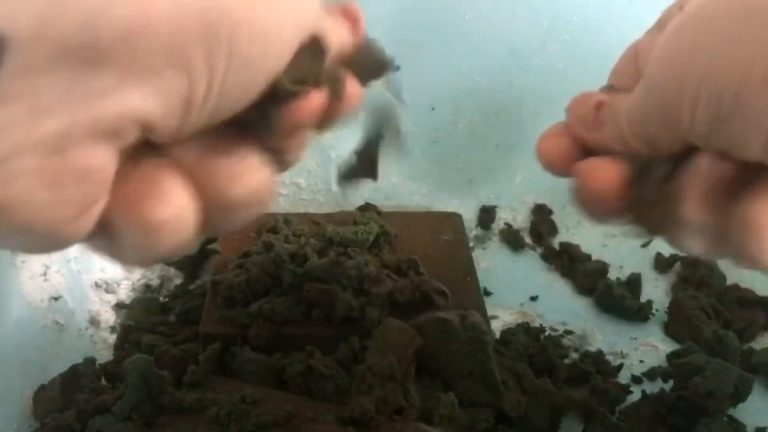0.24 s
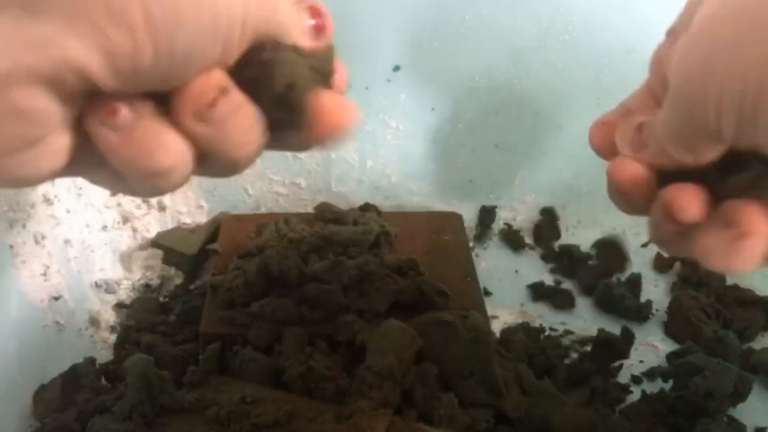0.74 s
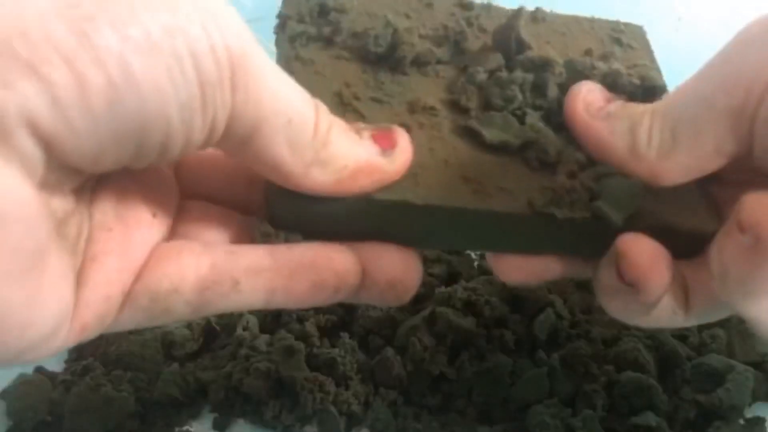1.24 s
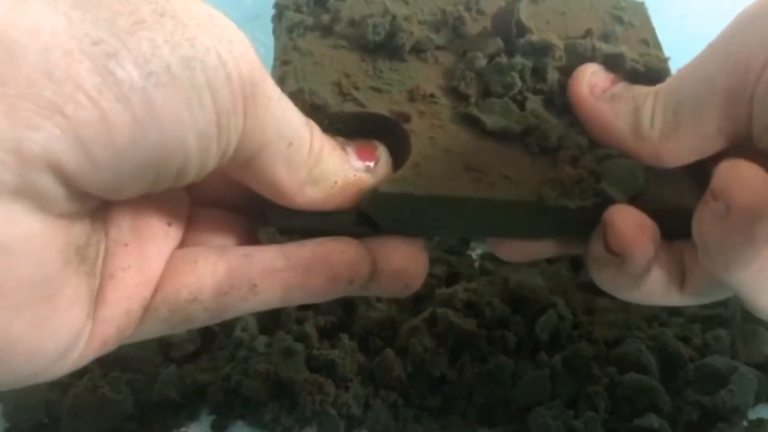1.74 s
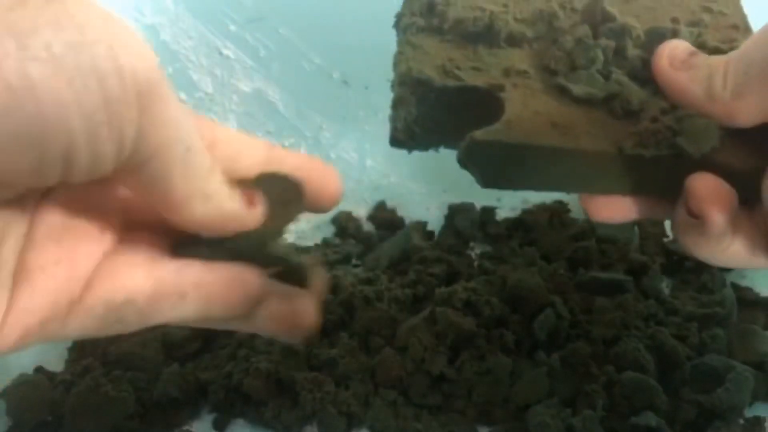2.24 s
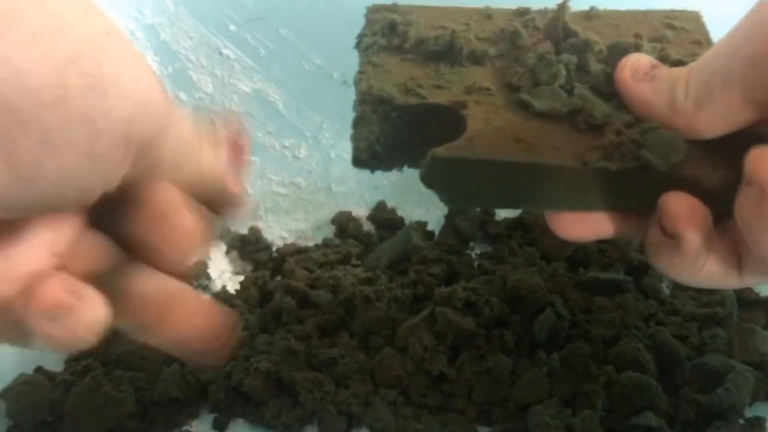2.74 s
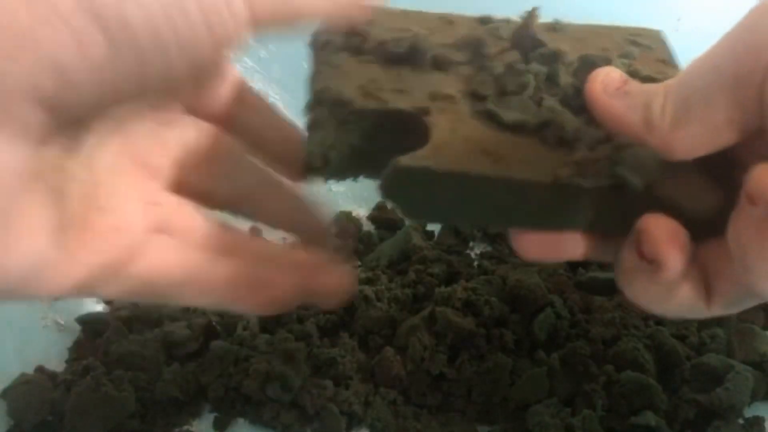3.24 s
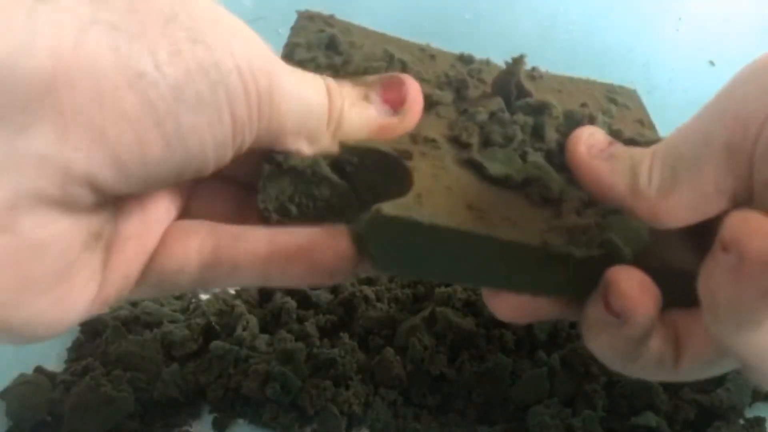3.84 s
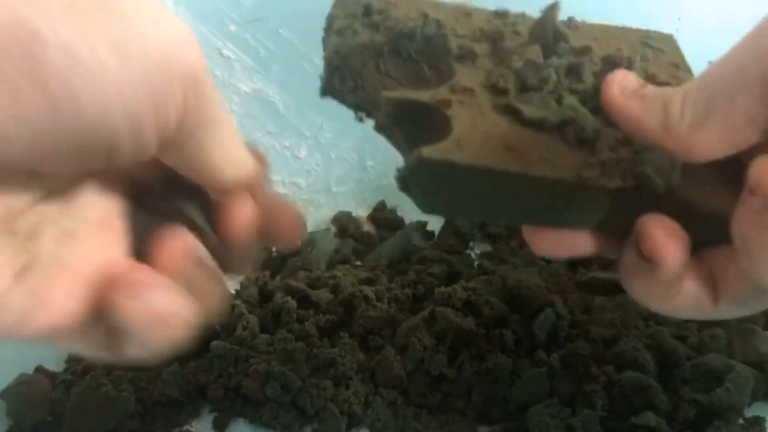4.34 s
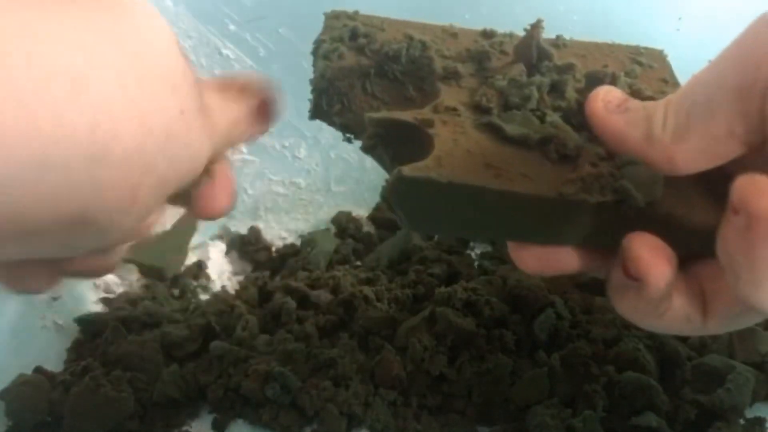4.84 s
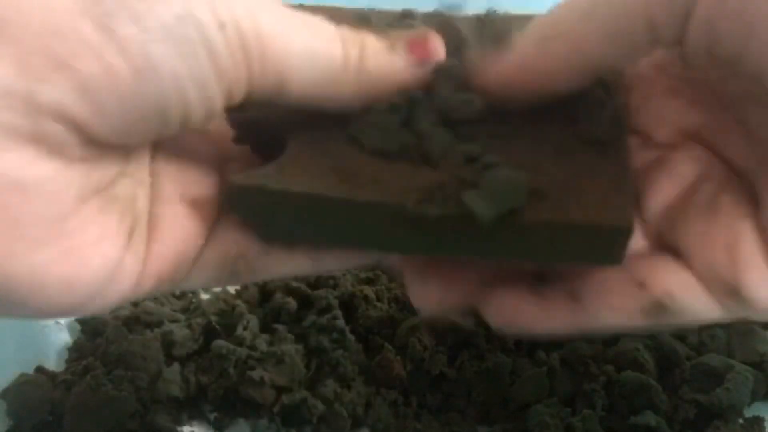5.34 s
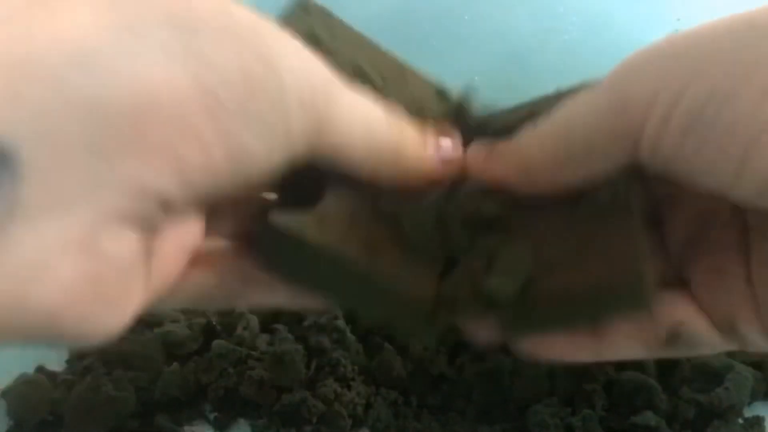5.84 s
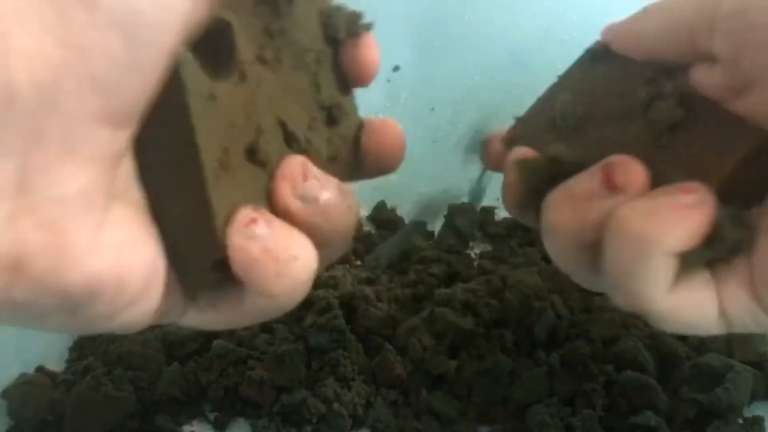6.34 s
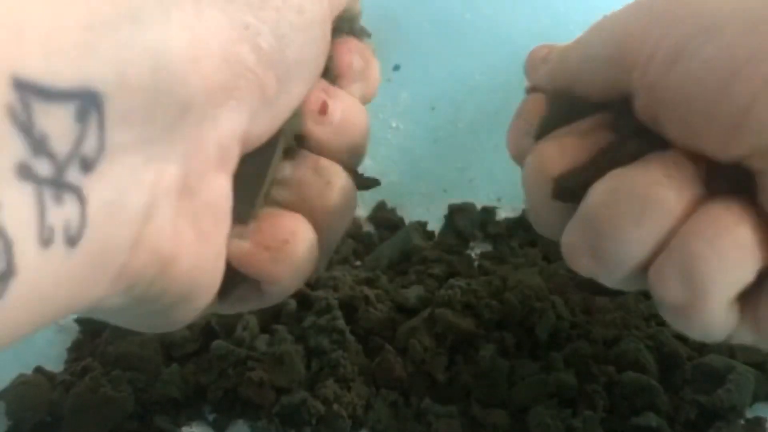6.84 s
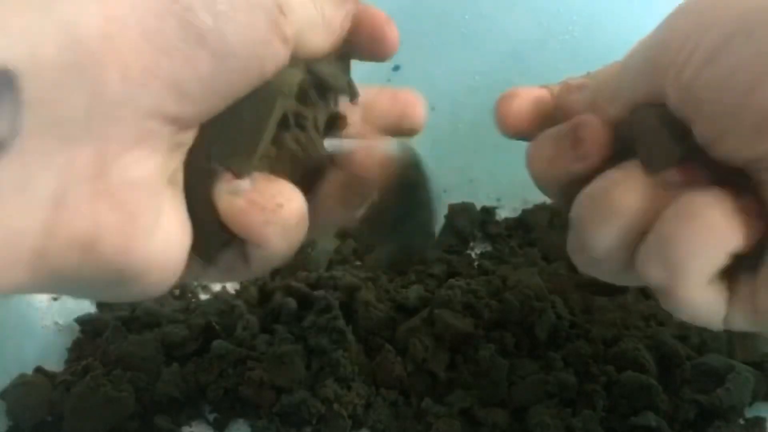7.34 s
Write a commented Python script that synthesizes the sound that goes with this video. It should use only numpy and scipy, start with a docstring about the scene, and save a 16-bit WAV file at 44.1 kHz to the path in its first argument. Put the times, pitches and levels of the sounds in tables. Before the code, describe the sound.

Close, dry handling of brittle foam over a hollow plastic tub, in a small quiet room with faint low noise. From 0 to 0.9 s, soft gritty, powdery rubbing fades and swells with light knocks, then drops briefly to dead silence. At 0.95-1.25 s a cluster of crunchy tears and heavy dull thumps breaks out. Very faint rubbing and tiny ticks follow, with small crunches around 1.8-2.5 s and a bump near 3.1-3.3 s. At 3.4-3.8 s a slowing, ratchet-like stutter of tears ends in stronger cracks; crisp crumbling and a squeaky scuff follow around 4-4.6 s. After a lull, the brick snaps at 5.45-5.6 s in loud, sharp cracks. Grinding rebuilds to a dense, popping crush at 6.35-6.8 s, then rougher crumbling with sharp pops around 7.3 s, thinning out by 7.6 s.

```python
"""Dry foam brick, snapped and crumbled over a tub

Hands rub, tear and snap a brick of dry floral foam over a plastic tub, close to a microphone.
Rubbing: random clicks of breaking cell walls, filtered as grit, fine powder and hollow brick body.
Tears, snaps and pops: click avalanches that shake the brick. Crumbs: single pitched breaks.
Scuffs ring at one pitch; soft knocks ring the tub and rattle crumbs.
The tub's hollow and echoes and a small room colour the foam; steady room noise lies beneath.
"""
import sys
import numpy as np
from scipy import signal
from scipy.fft import rfft, irfft
from scipy.io import wavfile

SR = 44100
rng = np.random.default_rng(int(sys.argv[2]) if len(sys.argv) > 2 else 0)


def master(y):
    """Save y as 16-bit WAV."""
    cut = np.clip(np.atleast_2d(y).T, -1, 1)
    pcm = np.round(cut * 32767)  # scale
    wavfile.write(sys.argv[1], SR, pcm.astype(np.int16))


N = 334278
TAPS = 2048
HZ = np.maximum(np.fft.rfftfreq(TAPS, 1 / SR), 1)

# room noise spectrum: freq_hz, gain_db
ROOM_NOISE = [(20, -94.5), (60, -44), (120, -44), (400, -50.5), (900, -55.5), (2000, -69), (6000, -78.5),
              (16000, -78.5)]
# small-room decay: freq_hz, t60_s
ROOM_DECAY = [(200, 0.23), (1000, 0.27), (4000, 0.21), (14000, 0.058)]
# tub wall reflections: delay_s, gain (linear)
TUB_ECHOES = [(.0013, -0.13), (.0026, -0.046), (.0034, .12), (.0043, -0.17)]
# peaks and dips of the hollow between tub and hands: centre_hz, width_hz, gain_db
TUB_HOLLOW = [(423, 61, 6.5), (593, 136, -10.5), (728, 284, 14), (910, 113, -3.5), (1078, 186, 4),
              (1235, 140, -1), (1505, 340, 5.5), (2150, 2000, -3), (2850, 660, 1), (4600, 600, -0.5),
              (5430, 940, 1.5)]
# microphone response: freq_hz, gain_db
MIC_RESPONSE = [(20, -16), (50, -6), (100, -5.5), (300, -7), (1000, -3.5), (3000, 0), (7000, 0.5),
                (11000, 0), (16000, 0.5)]
SILENCE_FROM_S, SILENCE_TO_S = 0.899, 0.951
EDGE_HZ = 16000

# knocks of fingers and lumps on brick and tub: start_s, level_db, brightness_hz, tub_db (re ring, rattle)
KNOCK_EVENTS = [(0.519, -14, 574, 15.5), (.557, -6, 600, 5), (1.103, 6.5, 450, -21), (1.198, 14, 296, -14),
                (1.211, 5, 260, -20), (3.073, 3.5, 900, 1), (3.256, -11.5, 700, 2), (3.259, 4, 140, -20),
                (4.09, 8.5, 400, -21), (5.212, -3, 160, -15), (5.272, 4.5, 450, -10), (5.32, .5, 304, -6),
                (5.604, -7, 180, -15), (5.758, -7, 524, -13), (5.93, -7, 250, -15), (6.291, 0.5, 870, -19),
                (6.325, 4.5, 890, -17), (6.773, -2, 1500, -17), (6.785, 1, 1310, -13),
                (6.957, 1.5, 600, -10), (7.029, -5, 504, -6)]
# tub ring: freq_hz, level_db (re ring), t60_s
TUB_RING_MODES = [(290, -2, .1), (409, 3, 0.18), (590, -18, .14), (700, 4, 0.15), (1050, -10.5, 0.12),
                  (1327, -25, .12)]
# lumps scraping each other in the fist: start_s, level_db, length_s, pitch_hz
SCUFF_EVENTS = [(.365, -49, 0.053, 2700), (0.651, -30, 0.026, 2800), (2.559, -31.5, 0.052, 2300),
                (4.211, -24.5, 0.049, 3840), (4.548, -26, 0.034, 2230), (4.734, -34.5, 0.077, 2150)]

# light rub of the holding fingers, faint as the hand lets go: time_s, level_db
HOLDING_RUB = [(0, -55), (.8, -49), (1.29, -46), (1.37, -61.5), (1.45, -66), (1.56, -45), (1.9, -53),
               (2.13, -66), (2.22, -46.5), (2.68, -45), (2.73, -52.5), (2.97, -54.5), (3.01, -64),
               (3.24, -79), (3.26, -50.5), (4.15, -40), (4.29, -49.5), (4.62, -45.5), (4.96, -47),
               (5.0, -40), (5.45, -39), (5.7, -48), (5.78, -38.5), (6.3, -41), (6.86, -49), (7.05, -39.5),
               (7.57, -55)]
HOLDING_PITCH_HZ, HOLDING_POWDER_DB, HOLDING_HOLLOW_DB = 2700, 1.5, -4  # dB re rub level
# squeezes and rubs: full_pressure_s, rise_s, hold_s, release_s, level_db, grit_pitch_hz,
# powder_db (re level), hollow_db (re level, before rubbing's body trim)
STROKE_EVENTS = [(0.0, 0.039, 0.069, 0.26, -35.5, 2930, 0, -10.5),
                 (0.122, 0.094, 0.038, .23, -42.5, 2000, 8.5, 3),
                 (0.374, 0.12, 0.036, 0.16, -40, 3080, -6.5, -9),
                 (0.522, 0.12, 0.17, 0.28, -36.5, 2600, -2.5, -10.5),
                 (0.959, .01, 0.23, 0.15, -39, 1330, 3, 3.5), (1.41, 0.023, 0.21, .15, -63, 2000, 15, 1),
                 (1.64, 0.012, 0.017, 0.13, -42.5, 2420, 4.5, 4.5),
                 (1.807, 0.08, 0.018, .08, -34, 2610, 4, 1.5), (2.005, 0.14, 0.022, .1, -35, 4400, 0, -7.5),
                 (2.312, .13, 0.031, 0.092, -36.5, 8000, -1.5, -39),
                 (2.418, 0.057, 0.065, 0.057, -37.5, 4000, 6, -28),
                 (2.792, 0.044, 0.0038, 0.07, -32.5, 4250, 1, -20),
                 (2.927, 0.049, 0.054, 0.012, -49.5, 3050, 1.5, 2),
                 (3.463, 0.18, .17, 0.15, -39.5, 2400, 4, 9.5),
                 (3.656, 0.035, 0.028, 0.062, -32.5, 1500, 7, 0.5),
                 (3.823, 0.0092, 0.0087, 0.11, -48, 2140, 3, 8),
                 (3.981, 0.044, 0.049, 0.076, -30, 2000, 0.5, 4.5),
                 (4.091, 0.028, 0.013, 0.024, -32, 4200, -3.5, 7.5),
                 (4.201, 0.014, 0.054, 0.019, -38, 3830, 0, -14),
                 (4.295, .01, 0.027, 0.058, -38.5, 3900, -3, -18),
                 (4.435, 0.064, 0.013, 0.087, -26, 4160, 0.5, -14.5),
                 (4.507, 0.11, 0.083, 0.072, -39, 2530, 9, -13), (4.84, 0.034, 0.014, .04, -47, 2860, 6, 6),
                 (4.987, .012, .13, .08, -43, 2200, -8, -6), (5.14, 0.18, 0.085, 0.44, -38.5, 1910, 0, 4.5),
                 (5.473, .015, 0.031, 0.058, -23, 1300, -1, -14),
                 (5.613, 0.018, 0.0097, 0.098, -22.5, 2180, -12, -6),
                 (5.863, 0.22, 0.28, 0.15, -34.5, 2500, 0.5, 0.5),
                 (6.402, 0.28, 0.27, 0.087, -23.5, 2120, 3.5, -4),
                 (6.677, 0.1, .11, 0.052, -29, 1310, 8.5, 3),
                 (6.958, 0.09, 0.054, 0.18, -34.5, 2160, -0.5, 0.5),
                 (7.186, 0.054, 0.23, 0.17, -34, 2020, 6, -7), (7.364, 0.044, .11, .1, -32.5, 1820, 4, 1)]
FADE_DB, FADE_CURVE = 26, 1.31  # fall over one rise or release; power of time
GRIP_WANDER_HZ, GRIP_WANDER_DB = 22, 0.8
# finest fizz muffled while both hands close round the brick
MUFFLED_FROM_S, MUFFLED_TO_S, MUFFLED_EASE_S, MUFFLED_HZ = 5.1, 6.2, 0.066, 12400

# In the crack tables level_db precedes a gain that grows with run_s.
# thumb tears sheets of cells: middle_s, level_db, run_s, pitch_hz, hollow_db (re brick gain)
TEAR_EVENTS = [(0.954, -19, 0.001, 1390, -2), (0.972, -22, 0.0046, 1210, -1),
               (1.0043, -16, 0.0023, 1480, -3), (1.0211, -23.5, 0.0045, 1460, -4),
               (1.04, -24, 0.0017, 1240, -20), (1.0688, -10.5, 0.00079, 3130, -0.5),
               (1.1003, -18, 0.0015, 1320, -24), (1.1479, -13, 0.0018, 1680, -1),
               (1.161, -18, 0.0028, 1250, -17), (1.1931, -12.5, 0.0025, 1690, 1.5),
               (1.2, -10, 0.0037, 2950, -8), (1.224, -23, 0.0086, 1390, -4),
               (1.6419, -28, 0.00095, 3350, 2.5), (3.6291, -17, 0.0025, 2900, 7),
               (3.652, -7.5, 0.0027, 2400, -1.5), (3.6979, -19.5, .0013, 1200, -5),
               (3.7244, -24, .0003, 8000, -17), (3.754, -32, 0.0021, 1500, -4),
               (3.758, -15, 0.00023, 2600, -6), (3.8247, -6.5, .00012, 1390, -3),
               (3.9735, -22.5, 0.0019, 4230, 8.5), (5.73, -31.5, 0.0027, 3000, 8)]
# brick snaps in two: middle_s, level_db, run_s, pitch_hz
SNAP_EVENTS = [(5.4646, 0, 0.00075, 3400), (5.4755, 3, 0.00026, 1880), (5.488, -11, 0.00051, 4120),
               (5.5014, 2, 0.00061, 2870), (5.5308, 2, 0.00034, 2310), (5.5742, 6, 0.00033, 1630),
               (5.5904, -1.5, 0.00099, 1960), (5.5966, -2, 0.00078, 2960), (5.6146, -9.5, 0.00058, 2160)]
# lumps burst between the fingers: middle_s, level_db, run_s, pitch_hz
POP_EVENTS = [(1.408, -39, 0.0017, 9500), (1.5046, -32, .0004, 9100), (1.557, -34.5, 0.0022, 9000),
              (1.8343, -17.5, 0.0013, 4660), (2.387, -23, 0.00073, 3960), (2.4913, -12, .00018, 4660),
              (2.511, -23, .0015, 4290), (4.2071, -9.5, 0.00028, 3700), (4.2141, -14.5, 0.00063, 3770),
              (4.434, -17, 0.0011, 5140), (4.46, -20, 0.001, 4760), (5.3877, -19.5, 0.00047, 2500),
              (6.0416, -14.5, 0.0006, 3370), (6.1987, -20, 0.00089, 5830), (6.2573, -16, .00069, 2840),
              (6.2796, -12, 0.00042, 2820), (6.3604, -14, 0.0031, 2300), (6.3825, -3.5, 0.00082, 2240),
              (6.394, -6.5, 0.00063, 2370), (6.421, -4.5, 0.00058, 3610), (6.4403, -3, 0.00086, 2010),
              (6.4594, -10, 0.0029, 3530), (6.4798, -3, .00052, 2280), (6.4945, -3, 0.0016, 1940),
              (6.5223, -7.5, 0.0013, 1920), (6.562, 0, 0.00036, 2370), (6.5855, -7, 0.0028, 2370),
              (6.6054, -7.5, 0.002, 3280), (6.6251, -1.5, 0.00037, 2600), (6.6406, -7, 0.00057, 7000),
              (6.649, -8, 0.0012, 3680), (6.6716, -10, 0.0017, 2210), (6.682, -11, 0.0019, 1690),
              (6.7, -10.5, 0.002, 3730), (6.7393, -3, 0.00012, 6600), (6.7653, -11, 0.00064, 1470),
              (6.8182, -14, 0.00055, 1430), (7.1991, -14, 0.0004, 3500), (7.2607, -12.5, 0.00097, 3800),
              (7.307, 3.5, 0.0001, 4100), (7.376, -3, 0.00012, 2850)]
# brick colour under the gouging thumb: centre_hz, width_hz, gain_db
GOUGED_COLOUR = [(780, 83, -5.5), (1074, 240, -8), (1500, 480, 7.5), (2150, 1000, -2.5), (3370, 2800, 1.5),
                 (4200, 320, -5.5)]
# brick colour as it snaps: centre_hz, width_hz, gain_db
SNAPPED_COLOUR = [(623, 200, 2), (960, 340, 9.5), (3000, 360, -5), (5800, 420, 3)]
TEAR_POWDER_DB = -0.2
SNAP_POWDER_DB, SNAP_HOLLOW_DB = -10, -13
POP_POWDER_DB, POP_HOLLOW_DB = -9, -16.5
# stick-slip run of small tears before a piece comes away
JUDDER_START_S, JUDDER_GAP_S, JUDDER_SLOWING_S, JUDDER_JITTER_S = 3.427, 0.0112, 0.00039, 0.001
JUDDER_SWELL_DB, JUDDER_SWELL_S = 13, 0.023  # initial deficit and its time constant
JUDDER_DB, JUDDER_RUN_S, JUDDER_HZ, JUDDER_HOLLOW_DB = -18, 0.0015, 2400, 5.5


def amp(db):
    """Decibels to gain."""
    return 10 ** (np.asarray(db) / 20)


def read(points, hz):
    """Interpolates (freq_hz, value) on a log-frequency axis."""
    f, value = np.transpose(points)
    return np.interp(np.log(hz), np.log(f), value)


def add(mix, start_s, sound):
    """Mixes a sound in at start_s."""
    part = mix[max(round(start_s * SR), 0):][:len(sound)]
    part += sound[:len(part)]


def causal(gain):
    """Minimum-phase impulse response with this gain on HZ, by folding the cepstrum."""
    cepstrum = irfft(np.log(np.maximum(gain, 1e-5)))
    cepstrum[1:TAPS // 2] *= 2
    cepstrum[TAPS // 2 + 1:] = 0
    return irfft(np.exp(rfft(cepstrum)))


def peaks(table):
    """Gain on HZ of a set of peaks and dips, summed in dB."""
    return amp(sum(db / (1 + (2 * (HZ - hz) / width_hz) ** 2) for hz, width_hz, db in table))


def resonance(pitch_hz, sharpness):
    """Gain on HZ of one resonance with steep skirts."""
    return 1 / (1 + (sharpness * (HZ / pitch_hz - pitch_hz / HZ) / 2) ** 2)


def delay_lows(ring):
    """Low notes arrive later than high ones: a blow becomes a short falling chirp."""
    turns = 1.3 * np.arctan(HZ / 380) + 0.9 * np.arctan(HZ / 1300) + 1.5 * np.arctan(HZ / 5000)
    return irfft(rfft(ring) * np.exp(-2j * np.pi * turns))


def wander(rate_hz):
    """Random drift of unit spread: linear between Gaussian knots."""
    knots = rng.standard_normal(N // 16)
    return np.interp(np.arange(N) * rate_hz / SR, np.arange(len(knots)), knots) * np.sqrt(3 / 2)


def cells(per_s, spread_db):
    """Clicks of breaking cell walls, many small and a few large, at unit power."""
    breaks = rng.random(N) < per_s / SR
    size = amp(spread_db * np.clip(rng.standard_normal(N), -2.5, 2.5))
    clicks = breaks * rng.choice([-1, 1], N) * size
    return clicks / np.std(clicks)


def grit(hz, pitch_hz):
    """Broad resonance of a fragment."""
    return 1 / (1 + 0.5 * (hz / pitch_hz - pitch_hz / hz) ** 2)


def powder(hz, low_hz=5500, high_hz=15000):
    """Fizz of the finest dust: a high band."""
    return 1 / np.sqrt((1 + (low_hz / hz) ** 4) * (1 + (hz / high_hz) ** 2))


def body(hz, low_hz, high_hz):
    """Hollow sound of the whole brick in the hands: a low band."""
    return 1 / np.sqrt((1 + (hz / high_hz) ** 4) * (1 + (low_hz / hz) ** 4))


def room_noise():
    """Steady noise of the quiet room: filtered white noise."""
    return signal.oaconvolve(rng.standard_normal(N), causal(amp(read(ROOM_NOISE, HZ))))[:N]


def surround(x, room_db=-24):
    """Hollow and wall echoes of the tub, then the faint decaying tail of a small room."""
    x = signal.oaconvolve(x, causal(peaks(TUB_HOLLOW)))[:N]
    hz, t, z = signal.stft(rng.standard_normal(SR // 3), SR, nperseg=256)
    hz = np.maximum(hz, 1)[:, None]
    decay = amp(-60 * t / read(ROOM_DECAY, hz))
    tail = signal.istft(z * decay / np.sqrt(1 + (hz / 5000) ** 2), SR, nperseg=256)[1]
    response = np.zeros(SR // 2)
    response[0] = 1
    add(response, 0.005, amp(room_db) * tail / np.linalg.norm(tail))
    for delay_s, gain in TUB_ECHOES:
        add(response, delay_s, gain * np.hanning(7)[1:-1] / 2)
    return signal.oaconvolve(x, response)[:N]


def knocking(ring_db=-53, rattle_db=-30, rattle_t60_s=0.067):
    """A dull push, then the short ring of the tub and the crumbs that shift in it."""
    out, t = np.zeros(N), np.arange(SR // 4) / SR
    modes = sum(amp(db - 60 * t / t60_s) * np.sin(2 * np.pi * hz * t) for hz, db, t60_s in TUB_RING_MODES)
    ring = amp(ring_db) * modes
    rattles = amp(rattle_db - 60 * t / rattle_t60_s) * rng.standard_normal((len(KNOCK_EVENTS), len(t)))
    for (start_s, level_db, bright_hz, tub_db), rattle in zip(KNOCK_EVENTS, rattles):
        band = body(HZ, low_hz=0.3 * bright_hz, high_hz=2.2 * bright_hz)
        push = causal(band / np.sqrt(1 + (HZ / (1.36 * bright_hz)) ** 10))
        response = (t == 0) + amp(tub_db) * (ring + rattle)
        add(out, start_s, amp(level_db) * signal.fftconvolve(delay_lows(push), response))
    return out


def scuffing(sharpness=4.7):
    """Short runs of coarse grains ring the cupped hand at one pitch."""
    out = np.zeros(N)
    grains = cells(per_s=1500, spread_db=3)
    for start_s, level_db, length_s, pitch_hz in SCUFF_EVENTS:
        run = grains[round(start_s * SR):][:round(length_s * SR)]
        run = run * signal.windows.tukey(len(run), 0.3)
        ring = causal(resonance(pitch_hz, sharpness))
        add(out, start_s, amp(level_db) * signal.fftconvolve(run, ring))
    return out


def handwork():
    """Strokes swell, hold and let go over the steady rub; powers add, colours mix by power share.

    Returns time_s, level_db, pitch_hz, powder_db and hollow_db (both re level).
    """
    s = np.arange(0, N, 64) / SR
    powers = [amp(np.interp(s, *np.transpose(HOLDING_RUB))) ** 2]
    colours = [(HOLDING_PITCH_HZ, HOLDING_POWDER_DB, HOLDING_HOLLOW_DB)]
    for full_s, rise_s, hold_s, release_s, level_db, *colour in STROKE_EVENTS:
        before, after = (full_s - s) / rise_s, (s - full_s - hold_s) / release_s
        away = np.maximum(np.maximum(before, after), 0)
        powers.append(amp(level_db - FADE_DB * away ** FADE_CURVE) ** 2)
        colours.append(colour)
    total = np.sum(powers, 0)
    share = np.array(powers) / total
    pitch_hz, powder_db, hollow_db = np.transpose(colours)
    mixed_pitch_hz = np.exp(np.log(pitch_hz) @ share)
    mixed_powder_db = 10 * np.log10(amp(powder_db) ** 2 @ share)
    mixed_hollow_db = 10 * np.log10(amp(hollow_db) ** 2 @ share)
    return s, 10 * np.log10(total), mixed_pitch_hz, mixed_powder_db, mixed_hollow_db


def crumbs(yield_db=-25, per_s=330, spread_db=6.0, sharpness=1.9, count=12):
    """Larger crumbs break singly, each at one of a set of pitches, as hard as the hand works."""
    s, level_db, pitch_hz = handwork()[:3]
    t = np.arange(N) / SR
    work_db, grit_hz = np.interp(t, s, level_db), np.interp(t, s, pitch_hz)
    effort = amp(work_db) / (1 + amp(yield_db - work_db))  # light rubbing breaks few crumbs audibly
    clicks = cells(per_s, spread_db) * effort
    kind = rng.integers(0, count, N)
    out = np.zeros(N)
    for k, hz in enumerate(np.geomspace(750, 9000, count)):
        chosen = clicks * (kind == k) * grit(hz, grit_hz)
        out += signal.oaconvolve(chosen, delay_lows(causal(resonance(hz, sharpness))))[:N]
    return 2 * out


def rubbing(grit_db=-0.03, body_db=-1.5, stick_db=-32):
    """Streams of breaking cells, clumped by the stick and slip of foam on foam."""
    s, level_db, pitch_hz, powder_db, hollow_db = handwork()
    time_s = np.arange(N) / SR
    # light strokes slide evenly; under pressure the foam sticks and slips
    pressure = 1 / (1 + amp(stick_db - np.interp(time_s, s, level_db)))
    slip = wander(rate_hz=260) * (0.35 + 0.65 * pressure)
    unsteady_db = GRIP_WANDER_DB * wander(rate_hz=GRIP_WANDER_HZ)

    def stream(clicks, slip_db, db):
        """Short-time spectra of clicks that follow slip and a level curve."""
        level = amp(np.interp(time_s, s, db) + unsteady_db)
        return signal.stft(clicks * amp(slip_db * slip) * level, SR, nperseg=512)

    hz, t, coarse = stream(cells(per_s=7300, spread_db=7.0), 3.74, level_db + grit_db)
    fine = stream(cells(per_s=28000, spread_db=6.5), 2.6, level_db + powder_db)[2]
    low = stream(cells(per_s=1800, spread_db=5), 3.1, level_db + hollow_db + body_db)[2]
    hz = np.maximum(hz, 1)[:, None]
    closed = np.clip(np.minimum(t - MUFFLED_FROM_S, MUFFLED_TO_S - t) / MUFFLED_EASE_S, 0, 1)
    fine = fine / np.sqrt(1 + closed * (hz / MUFFLED_HZ) ** 8)
    grit_hz = np.exp(np.interp(t, s, np.log(pitch_hz)))
    z = coarse * grit(hz, grit_hz) + fine * powder(hz) + low * body(hz, low_hz=70, high_hz=900)
    return signal.istft(z, SR, nperseg=512)[1][:N]


def judder(count=14):
    """Stick-slip tears: nominal gaps lengthen, level grows as the thumb bears down, both jittered."""
    k = np.arange(count)
    since_s = JUDDER_GAP_S * k + JUDDER_SLOWING_S * k * (k - 1) / 2
    late, size_db = rng.standard_normal((count, 2)).T
    level_db = JUDDER_DB + size_db - JUDDER_SWELL_DB * np.exp(-since_s / JUDDER_SWELL_S)
    middle_s = JUDDER_START_S + since_s + JUDDER_JITTER_S * late
    return [(s, db, JUDDER_RUN_S, JUDDER_HZ, JUDDER_HOLLOW_DB) for s, db in zip(middle_s, level_db)]


def fractures():
    """All cracks: middle_s, level_db, run_s, pitch_hz, powder_db, hollow_db, grip colour (gain)."""
    gouged, snapped = peaks(GOUGED_COLOUR), peaks(SNAPPED_COLOUR)
    rows = [(*row, TEAR_POWDER_DB, hollow_db, gouged) for *row, hollow_db in list(TEAR_EVENTS) + judder()]
    rows += [(*row, SNAP_POWDER_DB, SNAP_HOLLOW_DB, snapped) for row in SNAP_EVENTS]
    return rows + [(*row, POP_POWDER_DB, POP_HOLLOW_DB, 1) for row in POP_EVENTS]


def cracking(snap_s=0.0005, brick_hz=700, brick_sharpness=2.16, brick_db=3.0, thump_db=-13):
    """An avalanche of cell walls shakes the brick; the quickest are nearly one clean snap."""
    out, t = np.zeros(N), (np.arange(TAPS) - TAPS // 2) / SR
    cracks = fractures()
    showers = np.resize(cells(per_s=20000, spread_db=2), (len(cracks), TAPS))
    brick = amp(brick_db) * resonance(brick_hz, brick_sharpness)
    brick = brick + amp(thump_db) * body(HZ, low_hz=90, high_hz=450)
    for (middle_s, level_db, run_s, pitch_hz, powder_db, hollow_db, grip), shower in zip(cracks, showers):
        run_s = max(run_s, 1e-4)
        snap = np.exp(-(run_s / snap_s) ** 2)  # power share of the single click
        burst = shower * np.exp(-0.5 * (t / run_s) ** 2)
        burst *= np.sqrt(1 - snap) / np.linalg.norm(burst)
        burst[TAPS // 2] = np.sqrt(snap)
        colour = grip * np.hypot(grit(HZ, pitch_hz), amp(powder_db) * powder(HZ))
        size = amp(level_db) * np.sqrt(np.sqrt(np.pi) * run_s * SR)  # longer runs carry more energy
        add(out, middle_s + t[0], size * signal.fftconvolve(burst, delay_lows(causal(colour))))
        # the avalanche plus one kick half a run before its middle shake the brick
        kick = np.roll(t == 0, -round(run_s * SR / 2))
        shake = burst + np.sqrt(1 - snap) * kick
        shake = shake / np.linalg.norm(shake)
        shudder = signal.fftconvolve(shake, delay_lows(causal(grip * brick)))
        add(out, middle_s + t[0], size * amp(hollow_db) * shudder)
    return out


def scene():
    """Foam and knocks in the tub over the quiet of the room."""
    foam = rubbing() + scuffing() + cracking() + crumbs()
    return (surround(foam + knocking()) + room_noise())[None]


def record(dry):
    """Microphone colour, a moment of dead silence, overload clipping and the band limit."""
    t = np.arange(N) / SR
    x = signal.oaconvolve(dry, causal(amp(read(MIC_RESPONSE, HZ)))[None])[:, :N]
    audible = (t < SILENCE_FROM_S) | (t > SILENCE_TO_S)
    x = np.clip(x * audible, -1, 1)
    lowpass = signal.firwin(511, EDGE_HZ, window=("kaiser", 8), fs=SR)
    return signal.oaconvolve(x, lowpass[None], "same")


dry = scene()
out = record(dry)
master(out)
```